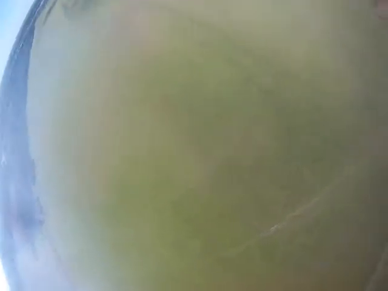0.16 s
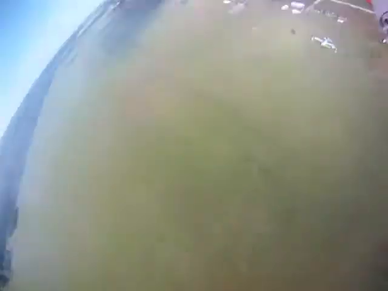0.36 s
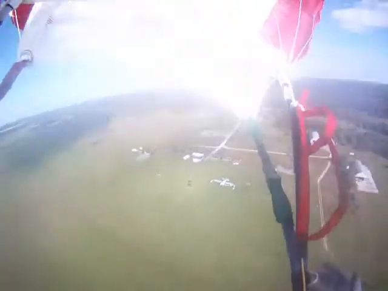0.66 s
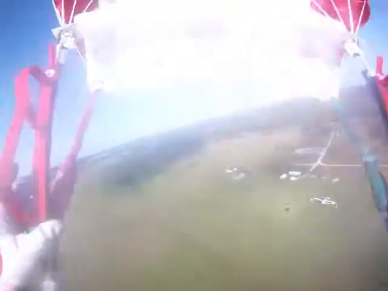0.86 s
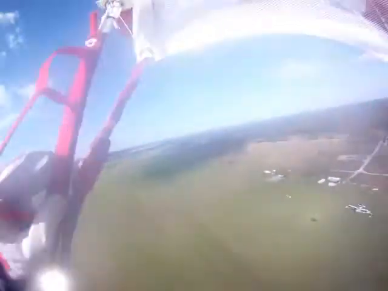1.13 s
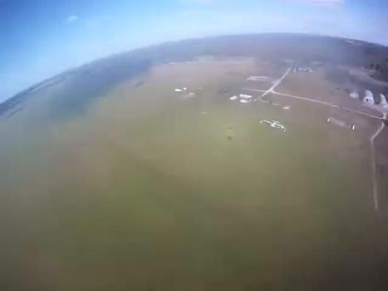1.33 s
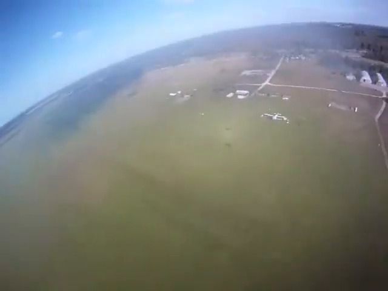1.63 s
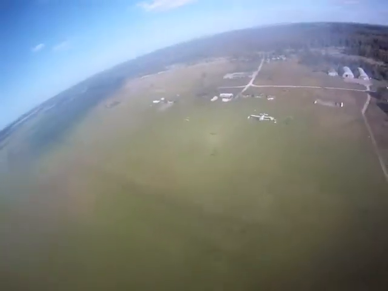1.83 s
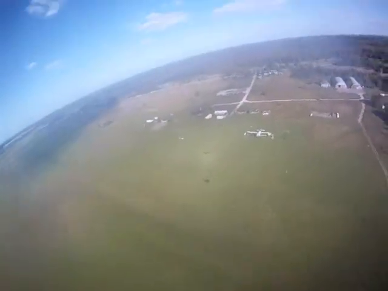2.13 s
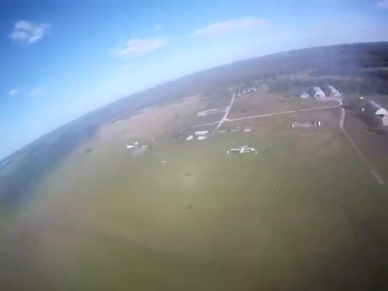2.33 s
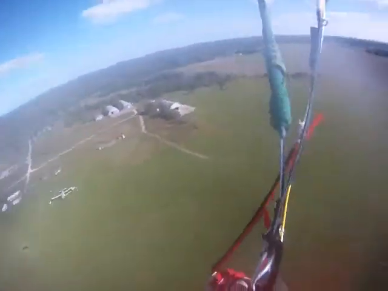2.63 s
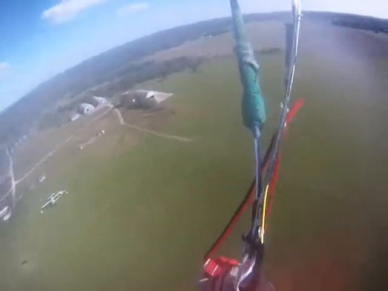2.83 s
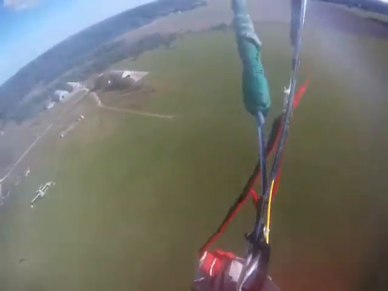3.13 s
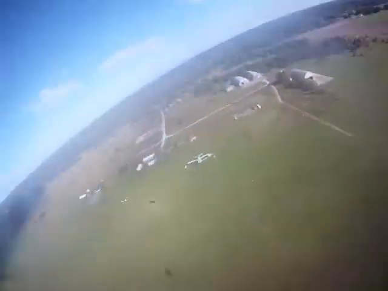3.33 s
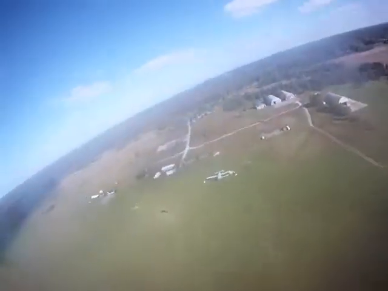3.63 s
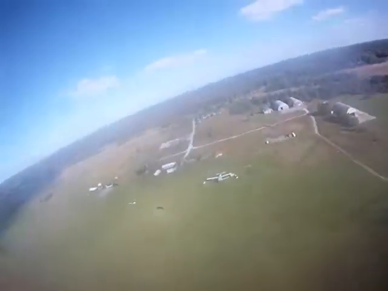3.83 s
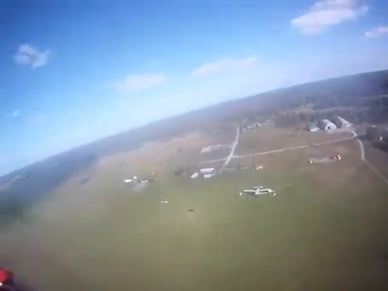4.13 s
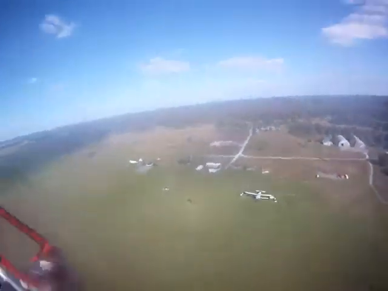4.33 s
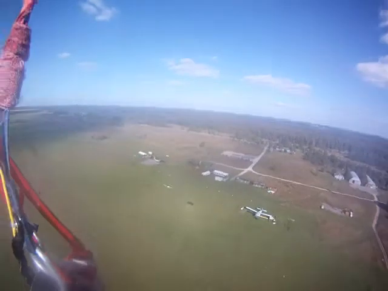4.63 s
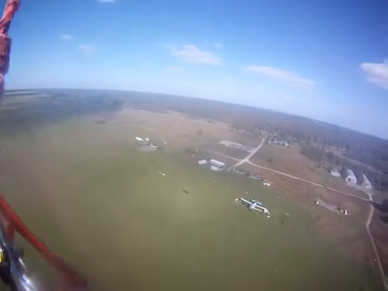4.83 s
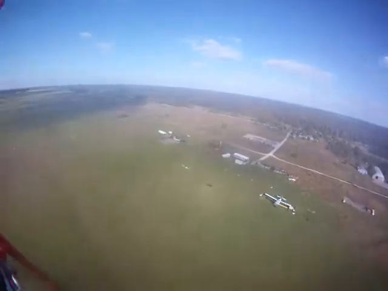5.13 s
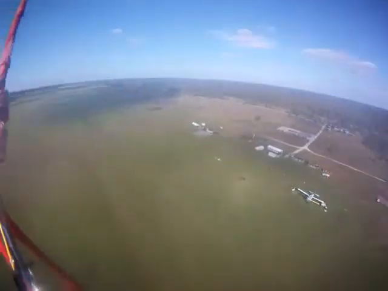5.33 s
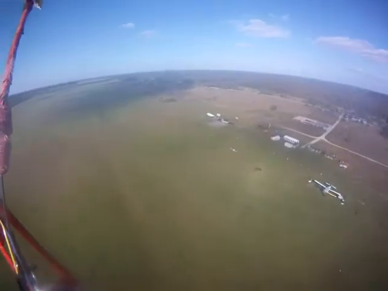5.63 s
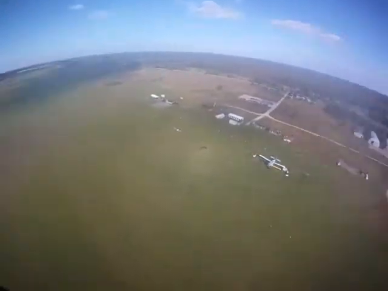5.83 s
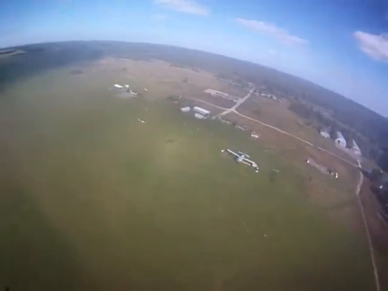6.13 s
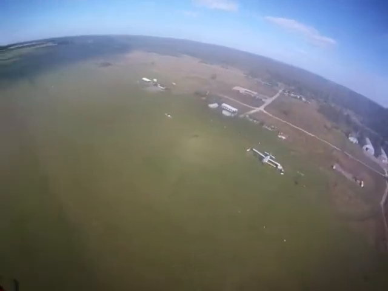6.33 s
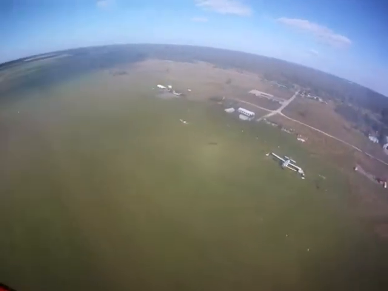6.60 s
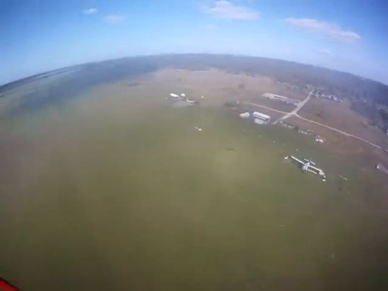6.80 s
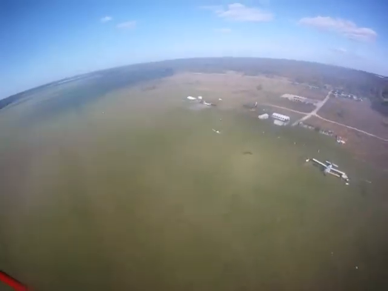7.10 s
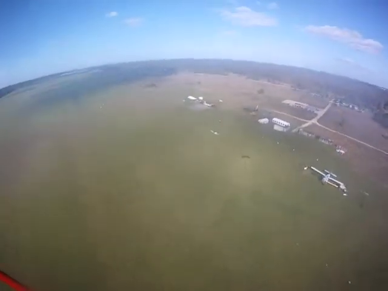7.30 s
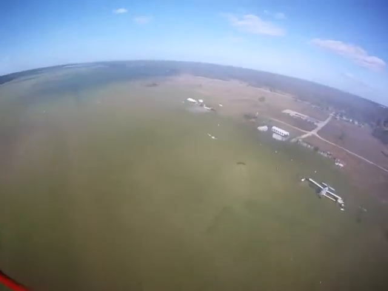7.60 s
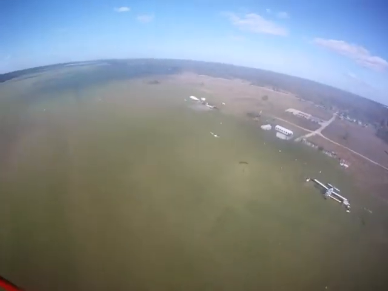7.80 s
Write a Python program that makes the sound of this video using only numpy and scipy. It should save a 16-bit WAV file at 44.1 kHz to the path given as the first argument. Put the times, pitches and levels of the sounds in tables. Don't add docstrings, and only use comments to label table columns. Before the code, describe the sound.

Harsh, ragged air rush and low buffeting fade within a few seconds to soft hiss, broken by strap ticks and a short thud.

```python
import sys
import numpy as np
from scipy import signal
from scipy.fft import rfft, irfft
from scipy.io import wavfile
from scipy.ndimage import uniform_filter1d

SR = 44100
rng = np.random.default_rng(int(sys.argv[2]) if len(sys.argv) > 2 else 0)


def invert_db(level):
    return 10 ** (np.asarray(level, dtype=float) / 20)


def dump(signal):
    limited = np.clip(np.atleast_2d(signal).T, -1, 1)
    pcm = np.round(limited * 32767).astype(np.int16)
    wavfile.write(sys.argv[1], SR, pcm)


N = 351036

# time_s, level_db
AIRFLOW = [(0, -22), (.3, -25.5), (.42, -27), (.75, -30.5), (1.15, -30.5), (1.35, -26.5), (1.62, -21.5),
           (1.95, -28), (2.1, -30.5), (2.47, -31), (2.62, -35.5), (3.3, -36.5), (4.0, -37.5), (4.5, -40.5),
           (5.2, -42.5), (5.85, -41), (6.5, -39.5), (7.96, -38.5)]
# time_s, share (0 open, 1 sheltered)
LEE = [(.35, 0.05), (.62, 0.4), (.83, 0.74), (.87, 0.22), (1.19, 0.15), (1.23, 0), (2.49, 0), (2.63, 1),
       (3.25, 1.1), (3.29, 0.15), (4.2, 0.05), (4.5, 0.33), (5.78, 0.67), (5.95, 0.02)]
# time_s, change_db, half_length_s
FLAPS = [(0, 4, 0.01), (.07, -5, 0.039), (.2, 3, 0.011), (.31, -2, .02), (.338, 1, .006), (.385, -5, 0.032),
         (.57, -9, 0.0076), (.6, 4.5, .012), (.65, 3, 0.011), (.72, -3, 0.023), (.845, -11, 0.027),
         (.91, 2.5, 0.042), (1.035, -12, .015), (1.11, -7, .012), (1.135, 9.5, 0.013), (1.18, -9, 0.011),
         (1.235, 4, 0.027), (1.275, -2, .012), (1.31, 7, 0.01), (1.42, 5.5, 0.014), (1.49, 7.5, 0.014),
         (1.57, 0, 0.012), (2.465, 2, .015), (2.5, -3.5, 0.018), (2.575, 4, 0.023), (3.315, 5.5, 0.027),
         (3.78, 9.5, 0.045), (3.63, 3.5, 0.049), (6.23, 8.5, 0.09)]
# time_s, change_db, half_length_s
WHOOSHES = [(.345, 6.5, 0.011), (.8, -4.5, 0.075), (1.3, 5.5, 0.091), (2.1, 2, 0.2), (2.66, 1, .012),
            (3.64, 5, 0.027)]
# level_in_mild_air_db, slope_db_per_db of airflow, full_lee_db, flap_share
LAYERS = [
    (-47.5, 1, -3, 0.24),
    (-37.5, 1.0, -5, 0.65),
    (-53, 0.83, -10, 0.3),
]


def wind_db(t, mild_db=-38, buffet_leak_db=-2):
    flow, lee, flap = follow(AIRFLOW, t) - mild_db, follow(LEE, t), bumps(FLAPS, t)
    roar, hiss, fizz = (db + slope * flow + lee_db * lee for db, slope, lee_db, _ in LAYERS)
    leak = follow(BUFFETING, t) + buffet_leak_db
    roar = 10 * np.log10(invert_db(2 * roar) + invert_db(2 * leak)) + bumps(WHOOSHES, t)
    return [level + layer[3] * flap for level, layer in zip((roar, hiss, fizz), LAYERS)]


# low_hz, high_hz
BANDS = [(450, 1600), (1700, 3900), (4300, 5600)]
# centre_hz, width_hz, change_db
HOLLOWS = [(398, 79, -3.5), (970, 130, -2.5), (2680, 340, -4)]


def turbulence(patchy_db=1.0, gust_db=0.28, flutter_db=0.75, rougher_per_db=0.016):
    frames = N // 64 + 5
    t = np.arange(frames) * 64 / SR
    hz, fine = np.fft.rfftfreq(256, 1 / SR), np.fft.rfftfreq(8192, 1 / SR)

    passed = invert_db(2 * housing_db(fine)) / len(fine)
    share_db = [10 * np.log10(passed[(fine > lo) & (fine < hi)].sum()) for lo, hi in BANDS]
    drive_db = np.array([level - share for level, share in zip(wind_db(t), share_db)])
    place = np.interp(hz, [1400, 1800, 3800, 4400], [0, 1, 1, 2])
    field_db = np.maximum(1 - abs(place[:, None] - np.arange(3)), 0) @ drive_db
    hollow_db = sum(db * np.exp(-((hz - f) / width) ** 2) for f, width, db in HOLLOWS)
    field_db = field_db + np.outer(hollow_db, follow(LEE, t))

    unrest = np.clip(1 + rougher_per_db * (drive_db[1] - drive_db[1].mean()), .3, 3)
    patches = chance(frames, len(hz), long=40, wide=3)
    gusts = chance(frames, 1, long=18, wide=1)
    flutter = chance(frames, 1, long=3, wide=1)
    field_db = field_db + unrest * (patchy_db * patches + gust_db * gusts + flutter_db * flutter)

    a, b = rng.standard_normal((frames, len(hz), 2)).T
    noise = a + 1j * b
    unit = np.sqrt(np.mean(signal.istft(noise, nperseg=256, noverlap=192)[1] ** 2))
    return signal.istft(noise * invert_db(field_db), nperseg=256, noverlap=192)[1][:N] / unit


# centre_hz, width_hz, level_db
CAVITY = [(694, 37, -6.5), (842, 120, -11), (1122, 150, -8.5), (1300, 230, -9.5), (1900, 110, -10.5),
          (2175, 283, -1), (2763, 92, -11), (3308, 220, -7.5), (3487, 335, -10.5), (4670, 250, -23),
          (5060, 370, -18.5)]
# frequency_hz, gain_db
SHELL = [(150, -3.5), (450, 3), (960, -4), (1060, 1.5), (3600, -1.5), (4000, -5.5), (4500, -6.5),
         (5300, -4), (5700, -6), (6000, -11.5), (6400, -16)]


def housing_db(hz):
    power = sum(invert_db(2 * db) / (1 + (2 * (hz - f) / width) ** 2) for f, width, db in CAVITY)
    return 10 * np.log10(power) + read(SHELL, hz)


def dip_at_knock(depth_db):
    return invert_db(depth_db * np.interp(np.arange(N) / SR, [3.27, 3.29, 3.335, 3.36], [0, 1, 1, 0]))


# time_s, level_db
BUFFETING = [(0, -35), (.42, -35.5), (.52, -30.5), (1.24, -32), (1.36, -36.5), (1.75, -41.5), (2.5, -43.5),
             (2.8, -50), (3.4, -46), (3.6, -49), (5.7, -53), (6.5, -48.5), (7.0, -46), (7.96, -46)]
# time_s, change_db, half_length_s
SURGES = [(.02, 4, 0.035), (.2, 6.5, 0.027), (.27, -8, .03), (.52, 5, 0.051), (.64, 0.5, .03),
          (.74, 2, 0.026), (.82, 3.5, 0.027), (1.55, 7, 0.043), (1.73, -7, .05), (2.15, 0, 0.038),
          (2.55, 5, 0.066), (2.79, 14.5, .04), (2.93, 5.5, 0.049), (3.04, 7, .03), (3.19, 4, 0.023),
          (3.72, -8, 0.036), (4.54, -5, 0.084), (4.72, 6.5, .08), (5.18, 7.5, 0.056), (5.76, 5.5, 0.14),
          (6.12, -5, 0.021), (6.27, 6, .05), (7.02, 4, 0.053), (7.12, -6, .02), (7.4, 2, 0.081)]


def buffet_db(t, swing_db=3, swing_lee_db=5.5, sway_db=-6, sway_slope=0.41, calm_db=-52, heave_db=2.3):
    rumble = follow(BUFFETING, t)
    heave = np.repeat(chance(N // 512 + 1, 1, long=7, wide=1)[0], 512)[:N]
    swing = rumble + swing_db + swing_lee_db * follow(LEE, t) + bumps(SURGES, t)
    sway = rumble + sway_db + sway_slope * (rumble - calm_db)
    sway = sway + heave_db * uniform_filter1d(heave, size=512)
    return swing, rumble, sway


# frequency_hz, level_db
RUMBLE = [(8, -20), (14, 4), (30, 4), (60, -5), (130, 3.5), (180, -2), (250, -3), (320, -8), (390, -11),
          (450, -18), (600, -14.5), (900, -29), (1400, -90)]


def shaking(lumpy_db=0.4, peaky=0.08, swing_hz=95, swing_width_hz=46, sway_hz=64, sway_width_hz=45):
    swing_db, rumble_db, sway_db = buffet_db(np.arange(N) / SR)
    a, b, c = rng.standard_normal((N, 3)).T

    swing = resonate_twice(a, swing_hz, swing_width_hz)
    swing = swing + invert_db(-14.5) * resonate_twice(a, 127, 85)
    swing = evened(swing + peaky * (swing ** 2 - uniform_filter1d(swing ** 2, 900)))
    sway = resonate_twice(c, sway_hz, sway_width_hz)

    hz = np.fft.rfftfreq(N, 1 / SR)
    colour = invert_db(read(RUMBLE, hz))
    colour = colour / np.sqrt(2 * np.sum(colour[(hz > 150) & (hz < 400)] ** 2) / N)
    rumble = irfft(rfft(b) * colour, N)

    lumps = np.repeat(chance(N // 256 + 1, 1, long=8, wide=1)[0], 256)[:N]
    rocking = swing * invert_db(swing_db - 0.5) + sway * invert_db(sway_db - 4.0) + rumble * invert_db(rumble_db - 2.0)
    return rocking * invert_db(lumpy_db * uniform_filter1d(lumps, 256))


# start_s, peak_db, length_s, mount_thump_db, favoured_hz
TICKS = [(0.325, -16, 0.0029, -40, 2170), (0.345, -7, 0.0042, -45, 2230), (0.529, -20, 0.0029, -40, 1980),
         (0.906, -22, 0.0034, -42, 2170), (0.919, -11, 0.0025, -42, 2160), (1.011, -15, 0.002, -26, 2020),
         (1.073, -11, 0.0016, -40, 2160), (1.126, -32, 0.0023, -40, 2190),
         (1.157, -11.5, 0.0019, -40, 2150), (1.208, -21, 0.0022, -40, 2430), (1.224, -6, 0.0033, -42, 2450),
         (1.237, -14, 0.003, -40, 2000), (1.296, -9, 0.006, -40, 2220), (1.411, -13, 0.004, -40, 2200),
         (2.12, -27, 0.0029, -37, 2120), (2.661, -20.5, 0.0019, -33, 2050), (3.77, -19, 0.0029, -46, 2270),
         (4.064, -31, 0.0023, -46, 2290)]
# start_s, peak_db, length_s, mount_thump_db, favoured_hz
SCRAPES = [
    (3.2857, -16.5, 0.0048, -36, 1900),
    (3.3005, -17.5, 0.0059, -45, 1150),
    (3.3135, -21, 0.0055, -49, 2050),
    (3.318, -17.5, 0.0037, -43, 2050),
    (3.323, -16.5, 0.013, -45, 1240),
    (3.332, -23, 0.0028, -39, 2300),
    (3.336, -16.5, 0.0044, -45, 1300),
]


def ticks(response, trim_db=-2.0, focus=0.41):
    out, t = np.zeros(N), np.arange(2048) / SR
    for s, db, length, thump_db, hz in TICKS + SCRAPES:
        noise = rng.standard_normal(2048)
        noise = (1 - focus) * noise + focus * evened(resonate(noise, hz, 630))
        puff = noise * (1 - np.exp(-t / 0.00023)) * np.exp(-(t / max(length, .0005)) ** 2)
        ring = signal.fftconvolve(puff, response)[:2048]
        push = invert_db(thump_db) * np.sin(2 * np.pi * 110 * t) * np.exp(-t / 0.0081)
        add(out, s, invert_db(db + trim_db) * ring / abs(ring).max() + push)
    return out


# start_s, peak_db, pitch_hz, t60_s
KNOCKS = [
    (3.287, -16.5, 98, .14),
    (3.319, -20, 95, .16),
    (1.207, -17, 95, .06),
    (1.122, -18, 100, .05),
]


def knocks():
    out, t = np.zeros(N), np.arange(SR // 4) / SR
    for s, db, hz, t60 in KNOCKS:
        swing = np.sin(2 * np.pi * hz * t) * (1 - np.exp(-t / 0.0011))
        add(out, s, -invert_db(db - 60 * t / t60) * swing)
    return out


def evened(x):
    return x / np.sqrt(np.mean(x ** 2) + 1e-20)


def read(points, hz):
    f, value = np.transpose(points)
    return np.interp(np.log(hz + 1), np.log(f + 1), value)


def follow(points, t):
    return np.interp(t, *np.transpose(points))


def bumps(rows, t):
    return sum(db * np.exp(-((t - s) / max(half, .004)) ** 2) for s, db, half in rows)


def add(mix, s, sound):
    part = mix[round(s * SR):][:len(sound)]
    part += sound[:len(part)]


def chance(frames, bins, long, wide):
    field = rng.standard_normal((frames, bins)).T
    return evened(uniform_filter1d(uniform_filter1d(field, long, axis=1), wide, axis=0))


def resonate(x, hz, width):
    turn = np.exp(2j * np.pi * np.cumsum(hz * np.ones(len(x))) / SR)
    r = np.exp(-np.pi * width / SR)
    return 2 * (turn * signal.lfilter([1 - r], [1, -r], x / turn)).real


def resonate_twice(x, hz, width):
    return evened(resonate(resonate(x, hz, width), hz, width))


def causal(db):
    log_gain = np.log(invert_db(np.maximum(db, -100)))
    circle = np.concatenate([log_gain, log_gain[-2:0:-1]])
    return np.fft.ifft(np.exp(np.conj(signal.hilbert(circle)))).real[:4096]


def scene():
    response = causal(housing_db(np.fft.rfftfreq(8192, 1 / SR)))
    rush = signal.oaconvolve(turbulence() * dip_at_knock(depth_db=-1.5), response)[:N]
    return (rush + shaking() + ticks(response) + knocks())[None]


# frequency_hz, level_db
DROPPED = [(5500, -60), (5750, -33.5), (6250, -32.5), (6500, -60), (10800, -60), (11100, -38), (11600, -29),
           (12000, -30), (12500, -23.5), (12900, -36), (14300, -34), (14600, -25), (15100, -25)]


def masked_bands_lost(x, jitter_db=6.0, starve_db=1.0, bass_pull=0.56, edge_hz=15120):
    stft = dict(fs=SR, nperseg=2048, noverlap=1024, window="cosine")
    hz, _, z = signal.stft(np.pad(x, (695, 0)), **stft)
    power = abs(z) ** 2
    band = np.arange(len(hz)) // 6
    level_db = 10 * np.log10(np.add.reduceat(power, np.arange(0, len(hz), 6))[band] / 6 + 1e-20)
    hiss_db = 10 * np.log10(np.mean(power[80:180], axis=0) + 1e-20)
    bass_db = 10 * np.log10(np.mean(power[2:8], axis=0) + 1e-20)

    luck = chance(z.shape[1], band[-1] + 1, long=3, wide=4)[band]
    starved_db = starve_db * rng.exponential(1, z.shape[1]) * np.clip((hz - 12000) / 1500, 0, 1)[:, None]
    busy_db = bass_pull * uniform_filter1d(bass_db - hiss_db - 9, size=2) * (hz > 14500)[:, None]
    limit_db = hiss_db + read(DROPPED, hz)[:, None] + jitter_db * luck + starved_db + busy_db
    keep = (level_db > limit_db) & (hz < edge_hz)[:, None]
    return signal.istft(z * keep, **stft)[1][695:][:N]


def treble_gaps(x, per_s=7, length_s=.017, above_hz=12300):
    top = signal.oaconvolve(x, signal.firwin(201, above_hz, pass_zero=False, fs=SR), "same")
    starts = rng.random(N) < per_s / SR
    depth = starts * rng.uniform(.8, 1.05, N)
    gaps = signal.oaconvolve(depth, signal.windows.tukey(round(length_s * SR), .7), "same")
    return x - top * np.clip(gaps, 0, 1)


def band_limit(x):
    return signal.sosfilt(signal.butter(12, 16310, fs=SR, output="sos"), x)


def record(dry):
    slow = signal.resample_poly(dry, 40, 147, axis=1)
    held = signal.resample_poly(np.repeat(slow, 4, axis=1), 147, 160, axis=1)[:, :N]
    finished = treble_gaps(masked_bands_lost(held[0]))[None]
    return band_limit(finished)


dry = scene()
out = record(dry)
dump(out)
```